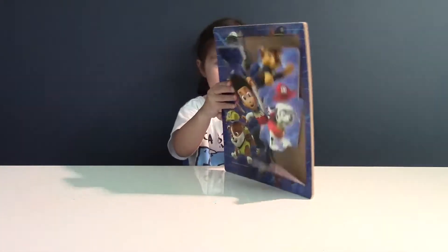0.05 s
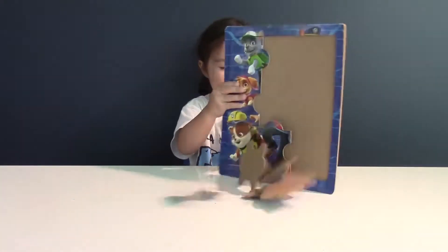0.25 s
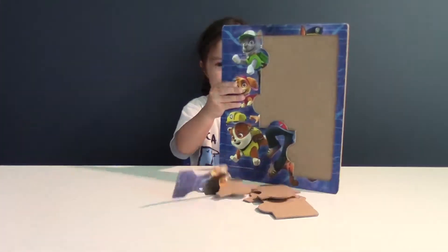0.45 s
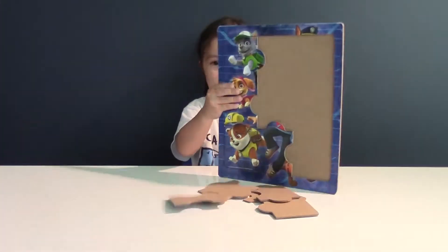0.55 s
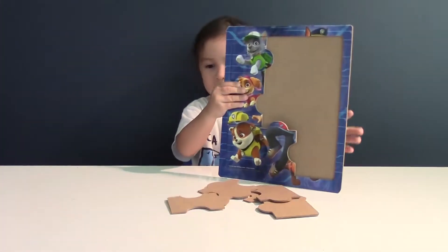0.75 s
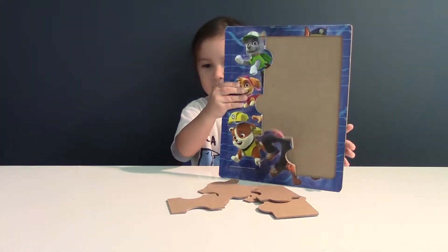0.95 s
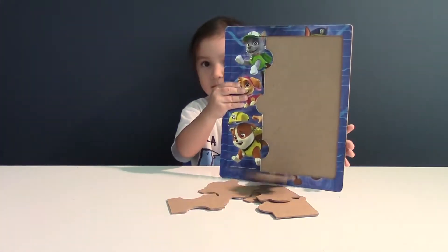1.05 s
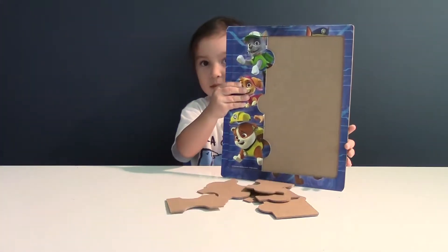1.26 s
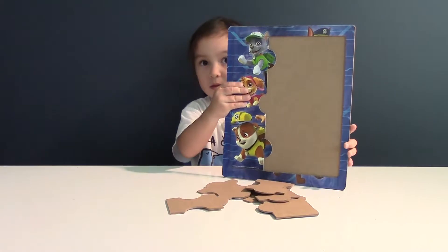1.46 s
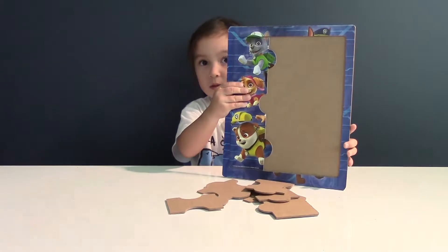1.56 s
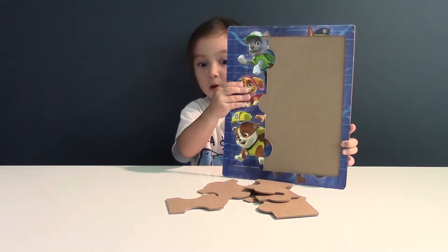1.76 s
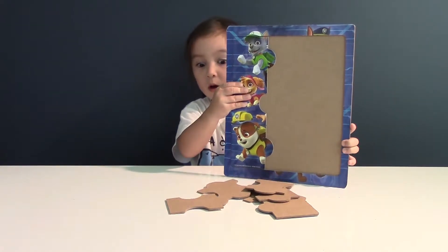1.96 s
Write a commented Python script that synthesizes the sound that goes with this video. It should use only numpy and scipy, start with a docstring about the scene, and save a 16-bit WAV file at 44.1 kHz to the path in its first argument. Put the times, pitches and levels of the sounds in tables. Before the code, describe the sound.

A quick clatter of wooden jigsaw pieces hits a table and each other in a small room, thinning to light ticks. A final piece lands with a softer clack and rattle, and fingers faintly rub the tray.

```python
"""Wooden puzzle pieces clatter on a tabletop and on each other as their tray is tipped in a small room.
They scrape loose, tumble out, and one rocks to rest; then a last piece drops, bounces and settles.
Each contact rings damped modes: a pitched clack, a knock and thud from the face, a tick from the edge.
Pieces and table ring on. Fingers rub the tray twice, over quiet room tone."""
import sys
import numpy as np
from scipy import signal
from scipy.fft import rfft, irfft
from scipy.io import wavfile
from scipy.ndimage import uniform_filter1d

SR = 44100
rng = np.random.default_rng(int(sys.argv[2]) if len(sys.argv) > 2 else 0)


def persist_wave(psi):
    """Save psi, clipped to +-1, as 16-bit WAV."""
    counts = np.round(np.clip(psi, -1, 1) * 32767).astype(np.int16)
    wavfile.write(sys.argv[1], SR, np.atleast_2d(counts).T)


N = 88200
BINS_HZ = np.fft.rfftfreq(2 * N, 1 / SR)

# Contacts. Each row: start in seconds, gain in dB, clack pitch in Hz, relative knock and tick in dB.
CONTACTS = [(.190,-37,1520,1,-10),(.2245,-12.5,1980,-6,-6.5),(.229,-10,2580,-3.5,5.5),(.242,-24,3070,7.5,7),(.278,-14,2530,-5.5,-7.5),
            (.2995,-8.5,2296,-34,-3.5),(.304,-5.5,2100,-10,-0.5),(.319,-8.5,2835,-6.5,-3),(.341,-16.5,2900,-13,-12.5),
            (.366,-16,1820,3.5,-0.5),(.3695,-9.5,1600,-3,-21),(.373,-9.5,1933,-2.5,-12.5),(.3805,-10,2447,-10,7),(.3845,-11,3326,-10.5,10.5),
            (.398,-12.5,3340,-5,-6),(.410,-13,2795,-8.5,0),(.430,-8.5,2266,-7,-6.5),(.435,-20.5,2500,0,9.5),(.4455,-15,2920,-6.5,-5.5),(.457,-13,2820,-16,-6),
            (.4755,-17.5,1530,4,-15.5),(.487,-17.5,1824,-9.5,4.5),(.511,-17.5,3350,-10,3),(.539,-17,1720,-4,0),(.543,-16,2800,-2,-8.5),
            (.5562,-8,2483,-5.5,-9.5),(.599,-30.5,2860,6.5,-30),(.617,-26.5,3750,0,6),(.622,-18,2090,-16,-20),(.6485,-15.5,2890,-2,-7),(.6575,-20.5,2660,-1.5,5),
            (.665,-26,3090,-1,-14.5),(.684,-31,2100,5,-20),(.762,-28,1550,2.5,-1.5),(.776,-23,2180,-1,-19),(.799,-42.5,1710,-7,7.5),
            (.818,-30.5,3000,2,-16),(.857,-35,1510,5,-1.5),(.905,-33.5,1970,0,-3),(.9435,-37.5,1770,3,-1),(.971,-44.5,1944,-1.5,0),(.992,-45.5,1490,4,-3.5),(1.007,-54.5,1500,11,2),
            (1.1922,-22,2110,-2.5,-0.5),(1.1943,-13,2010,-6,-10.5),(1.2035,-23,2790,2,-21),(1.209,-27,1407,-5,-10.5),(1.2155,-23,2184,-2,-19),(1.241,-31,2140,-22,-13),(1.2645,-34,3200,-12,-12),
            (1.2935,-26,2750,-0.5,-13),(1.305,-34.5,2730,-13,-13),(1.3115,-22,2360,-0.5,-7.5),(1.317,-26,2250,3,-0.5),(1.325,-27.5,2580,-21,-9),(1.3445,-31,1590,-7,-2.5),(1.348,-27,1520,0,-10),(1.362,-32,2375,4,-12),
            (1.388,-31.5,2230,-1,-6.5),(1.420,-45,2310,-15,-0.5),(1.437,-46.5,2180,-8.5,-9.5)]
# Tray or flat piece bumping the table. Each row: start in seconds, gain in dB.
TABLE_BUMPS = [(.250,-18.5),(.256,-21.5),(.269,-27),(.284,-27),(1.1945,-23)]
# Bending modes of a piece. Each row: ratio to clack pitch, relative level in dB.
BENDING_MODES = [(0.621,-6.5),(1,3),(1.362,-12.5),(1.851,-13)]
# Long modes of pieces and table. Each row: frequency in Hz, relative level in dB, T60 in seconds.
WOOD_MODES = [(204.4,-46,0.72),(316,-44.5,0.27),(445,-50.5,0.28),(1030,-37.5,0.1),(1420,-32,0.042),(1920,-39.5,0.034),(2193,-36,.18),
              (2360,-35.5,.13),(2776,-38,0.14),(3030,-34.5,0.26),(3290,-40,0.48),(5616,-33,0.19),(8600,-32.5,0.05),(9000,-38.5,0.18)]
# Pieces springing clear. Each row: start in seconds, gain in dB, pitch in Hz, T60 in seconds.
REBOUND_RINGS = [(.250,-15.5,444,0.045),(.255,-16.5,315,.1),(.2865,-8.5,2763,0.063),(.2995,-7.5,2230,0.036),(.300,-11.5,1876,0.14),(.3175,-11,2887,.035),(.337,-13.5,1886,.17),(.356,-16,1122,.15),(.368,-12,629.6,0.072),
                 (.5565,-8.5,2050,0.035),(.649,-23,3044,0.15)]
# Clatter colour at the microphone. Each row: frequency in Hz, gain in dB.
CLATTER_EQ = [(40,0),(100,-7),(400,0.5),(800,-1.5),(1600,-1),(2500,1),(3800,3),(4700,0),(5700,1),(6700,-0.5),(8500,-1.5),(10500,-3),(13000,-2),(16000,-3.5)]
# Scrape envelope. Each row: time in seconds, level in dB.
SCRAPE_ENVELOPE = [(0,-54),(.03,-50.5),(.07,-45.5),(.09,-51),(0.136,-43.5),(.165,-52),(0.221,-50.5)]
# Scrape colour. Each row: frequency in Hz, relative gain in dB.
SCRAPE_EQ = [(60,-19),(220,-1),(500,-9),(1500,-14.5),(4500,-15.5),(12000,-19.5),(15000,-24)]
# Resonances of the rubbed tray. Each row: centre in Hz, width in Hz, gain in dB.
TRAY_RESONANCES = [(2880,580,-5.5),(5640,200,3),(8550,710,15)]
# Finger rubs. Each row: start in seconds, gain in dB.
FINGER_RUBS = [(1.869,-58),(1.909,-57.5)]
# Room decay. Each row: frequency in Hz, T60 in seconds.
ROOM_T60_S = [(100,0.61),(400,0.39),(1000,0.31),(2800,0.39),(7000,.33),(14000,.22)]
# Reflection strength. Each row: frequency in Hz, gain in dB.
REVERB_EQ = [(100,-0.5),(500,-0.5),(2500,-3.5),(6000,-3.5),(9000,-9.5),(15000,-0.5)]
# Room tone spectrum. Each row: frequency in Hz, relative level in dB.
ROOM_TONE_EQ = [(15, -73.5), (25, -30), (170, -10.5), (400, -9.5), (887, -14), (1610, -18.5),
                (10700, -33.5), (16000, -51)]
# Stereo width. Each row: frequency in Hz, side relative to mid in dB.
SIDE_EQ = [(60,-25),(1200,-55),(2400,-27.5),(3600,-23),(5600,-18.5),(10000,-28)]

CONTACT_RISE_S, CONTACT_ENERGY_S = 0.00031, 0.0029  # energy as seconds at rms 1


def contacts(spot_count=4, gain_db=-1, bend_db=-6.5, crunch_db=-2, thud_db=-11, crunch_ratio=1.562):
    """Pieces strike with face and edge, and the table is bumped. One track per spot on the table."""
    spots = np.zeros((spot_count, N))
    for k, (start_s, db, hz, knock_db, tick_db) in enumerate(CONTACTS):
        knock = impact(559, 1515, t60_s=0.022, order=3)
        thud = amp(thud_db) * impact(138, 465, t60_s=0.068)
        bend = amp(bend_db) * bending(hz)
        crunch = amp(crunch_db) * impact(hz / crunch_ratio, hz * crunch_ratio, t60_s=0.017)
        tick = amp(tick_db) * impact(5340, 10010, t60_s=0.015)
        contact = bend + crunch + amp(knock_db) * (knock + thud) + tick
        add(spots[k % spot_count], start_s, amp(db + gain_db) * contact)
    for k, (start_s, db) in enumerate(TABLE_BUMPS):
        add(spots[k % spot_count], start_s, amp(db) * impact(97.5, 420, t60_s=0.12, order=3))
    return spots


def impact(low_hz, high_hz, t60_s, order=2):
    """A blow rings a dense cluster of heavily damped modes, different at every contact point."""
    t = np.arange(SR // 10) / SR
    noise = rng.standard_normal(len(t)) * rise(t, CONTACT_RISE_S) * decay(t, t60_s)
    band = signal.butter(order, [low_hz, high_hz], "band", fs=SR, output="sos")
    return to_contact_energy(signal.sosfilt(band, noise))


def bending(hz, t60_s=0.026):
    """A few quickly damped bending modes give a clack its pitch."""
    t = np.arange(SR // 10) / SR
    modes = sum(amp(db) * np.sin(2 * np.pi * (hz * ratio * t + rng.random()))
                for ratio, db in BENDING_MODES)
    return to_contact_energy(modes * rise(t, CONTACT_RISE_S) * decay(t, t60_s))


def wood_ring(strikes, ring_db=-15.5, detune=0.0046):
    """Strikes plus the longer ring of pieces and table, detuned as pieces differ in size."""
    t = np.arange(SR // 2) / SR
    ring = np.zeros(len(t))
    for hz, db, t60_s in WOOD_MODES:
        detuned_hz = hz * (1 + detune * rng.standard_normal())
        ring += amp(db + ring_db) * decay(t, t60_s) * np.cos(2 * np.pi * detuned_hz * t)
    return strikes + signal.fftconvolve(strikes, ring)[:N]


def rebounds(rise_s=0.00027, reverb_db=-3.5):
    """Pieces spring clear of the pile, each ringing into the room at one pitch."""
    t = np.arange(SR // 2) / SR
    rings = np.zeros(N)
    for start_s, db, hz, t60_s in REBOUND_RINGS:
        tone = np.sin(2 * np.pi * (hz * t + rng.random()))
        add(rings, start_s, amp(db) * tone * rise(t, rise_s) * decay(t, t60_s))
    return rings + amp(reverb_db) * (room(rings) - rings)


def scrape(grain_db=2, ring_fade_s=0.082):
    """Grainy friction of sliding pieces; the tray's resonances fade as they come loose."""
    t = np.arange(N) / SR
    noise = rng.standard_normal(N)
    roughness = unit_rms(uniform_filter1d(rng.standard_normal(N), size=60))
    friction = noise * amp(grain_db * roughness)
    tray = sum(amp(db) * signal.lfilter(*signal.iirpeak(hz, hz / width_hz, fs=SR), friction)
               for hz, width_hz, db in TRAY_RESONANCES)
    sliding = friction + np.exp(-t / ring_fade_s) * tray
    times_s, levels_db = np.transpose(SCRAPE_ENVELOPE)
    return unit_rms(equalise(sliding, SCRAPE_EQ)) * np.interp(t, times_s, amp(levels_db), right=0)


def fingers(peak_s=0.00612, band_hz=(650, 3000)):
    """Fingers shift on the tray: soft rubs that swell and fade."""
    t = np.arange(SR // 10) / SR
    swell = t / peak_s * np.exp(1 - t / peak_s)
    band = signal.butter(1, band_hz, "band", fs=SR, output="sos")
    rubs = np.zeros(N)
    for start_s, db in FINGER_RUBS:
        friction = unit_rms(signal.sosfilt(band, rng.standard_normal(len(t))))
        add(rubs, start_s, amp(db) * swell * friction)
    return rubs


def room(direct, reflections_per_s=3000, delay_s=0.0046, build_s=0.0015):
    """Direct sound plus sparse reflections whose treble dies first."""
    t = np.arange(SR * 3 // 4) / SR
    taps = rng.choice([-1., 1.], len(t)) * (rng.random(len(t)) < reflections_per_s / SR)
    taps *= np.clip((t - delay_s) / build_s, 0, 1)
    hz, frames_s, spectra = signal.stft(taps, SR, nperseg=256)
    tail = signal.istft(spectra * decay(frames_s, lookup(ROOM_T60_S, hz)[:, None]), SR)[1]
    reflections = signal.fftconvolve(direct, tail / np.linalg.norm(tail))[:N]
    return direct + equalise(reflections, REVERB_EQ)


def room_tone(level_db=-60.5):
    """Quiet steady background noise."""
    return amp(level_db) * unit_rms(equalise(rng.standard_normal(N), ROOM_TONE_EQ))


def amp(db):
    return 10 ** (np.asarray(db) / 20)


def rise(t, rise_s):
    return 1 - np.exp(-t / rise_s)


def decay(t, t60_s):
    return np.exp(-np.log(1000) * t / t60_s)


def unit_rms(x):
    return x / np.sqrt(np.mean(x ** 2) + 1e-20)


def to_contact_energy(x):
    return x * np.sqrt(CONTACT_ENERGY_S * SR / np.sum(x ** 2))


def add(mix, start_s, sound):
    part = mix[round(start_s * SR):][:len(sound)]
    part += sound[:len(part)]


def lookup(table, hz):
    """Interpolates on a log-frequency axis."""
    table_hz, values = np.transpose(table)
    return np.interp(np.log(hz + 1), np.log(table_hz + 1), values)


def equalise(x, curve, causal=True):
    """Applies a gain curve: minimum phase if causal, else zero phase."""
    log_gain = np.log(amp(lookup(curve, BINS_HZ)))
    if causal:
        mirrored = np.r_[log_gain, log_gain[-2:0:-1]]
        log_gain = np.conj(signal.hilbert(mirrored))[:len(BINS_HZ)]
    return irfft(rfft(x, 2 * N) * np.exp(log_gain))[:N]


def scene(tone_side_db=-7.5):
    """Clatter, scrape and fingers are nearly mono; the room tone is wider."""
    clatter = sum(room(wood_ring(spot)) for spot in contacts()) + rebounds()
    puzzle = equalise(clatter + room(fingers()), CLATTER_EQ) + scrape()
    quadrature = signal.hilbert(puzzle).imag
    side = equalise(quadrature, SIDE_EQ, causal=False) + amp(tone_side_db) * room_tone()
    mid = puzzle + room_tone()
    return np.array([mid + side, mid - side])


def record(dry, ceiling_db=0.5, release_db_per_s=195.5, cutoff_hz=16000):
    """Fast limiter on the loudest clacks, then clip and low-pass."""
    release_db = np.arange(N) * release_db_per_s / SR
    over_db = np.maximum(20 * np.log10(abs(dry).max(0) + 1e-9) - ceiling_db, 0)
    reduction_db = np.maximum.accumulate(over_db + release_db) - release_db
    limited = dry / amp(uniform_filter1d(reduction_db, size=40))
    lowpass = signal.firwin(255, cutoff_hz, window=("kaiser", 8), fs=SR)
    return signal.oaconvolve(np.clip(limited, -1, 1), lowpass[None], "same")


dry = scene()
out = record(dry)
persist_wave(out)
```